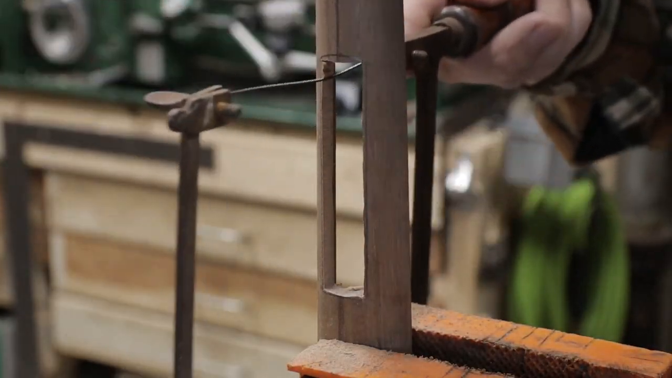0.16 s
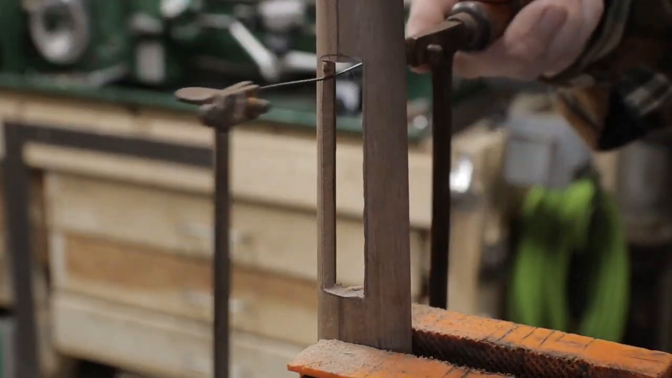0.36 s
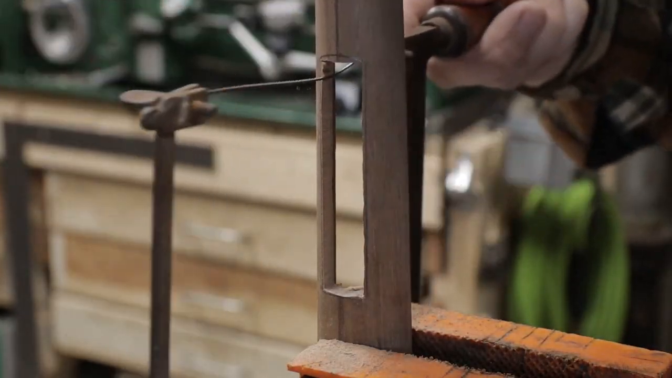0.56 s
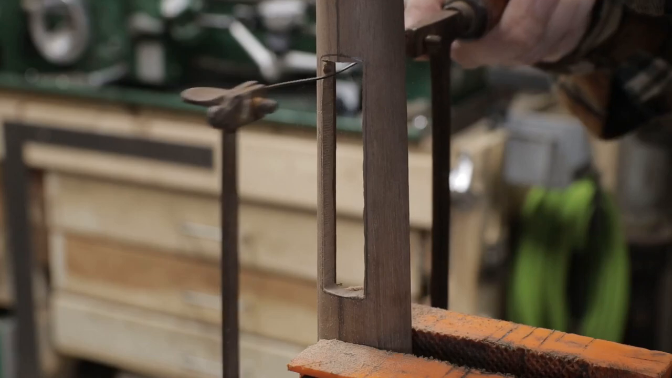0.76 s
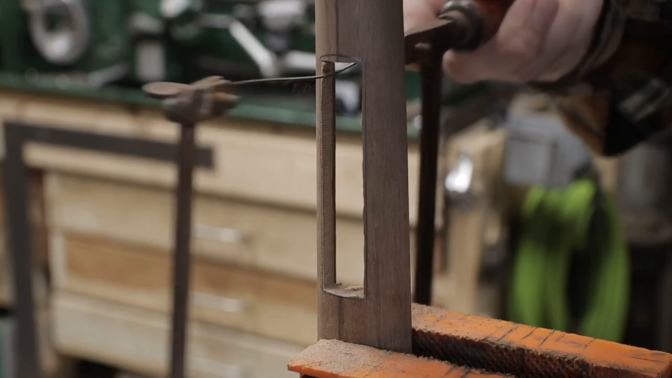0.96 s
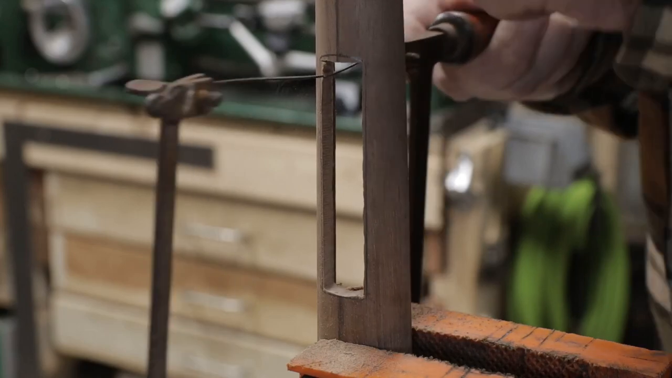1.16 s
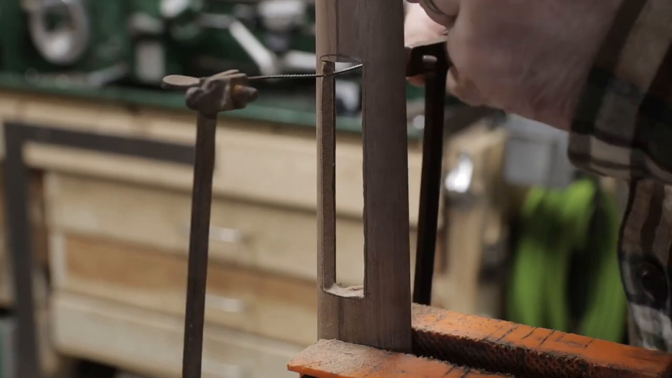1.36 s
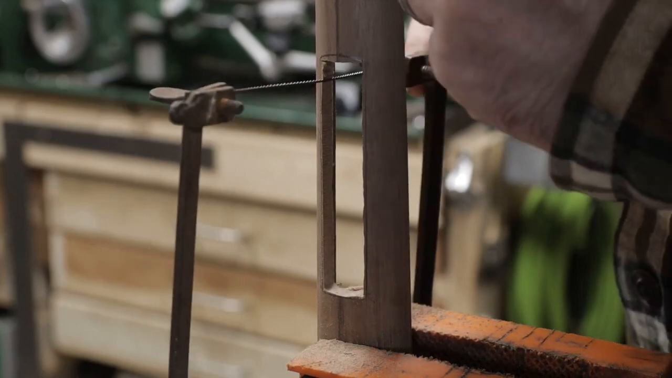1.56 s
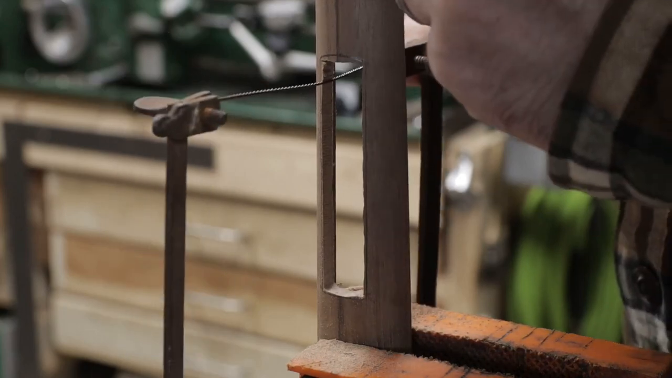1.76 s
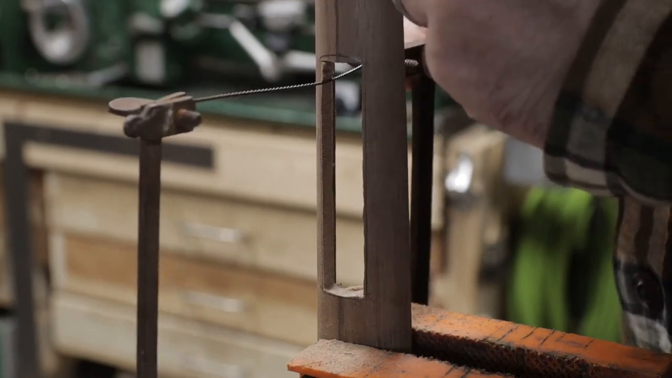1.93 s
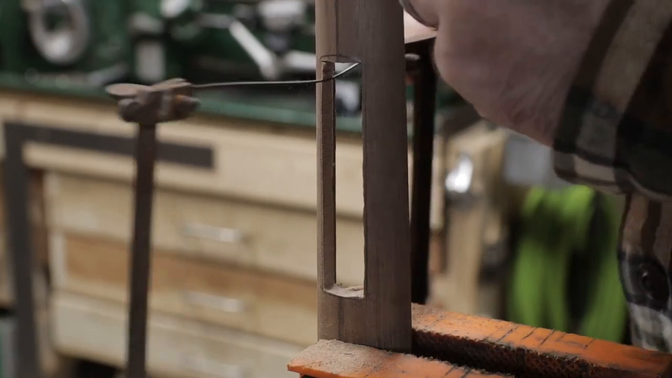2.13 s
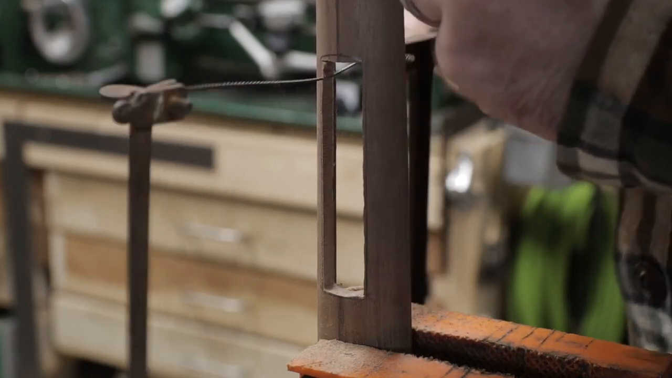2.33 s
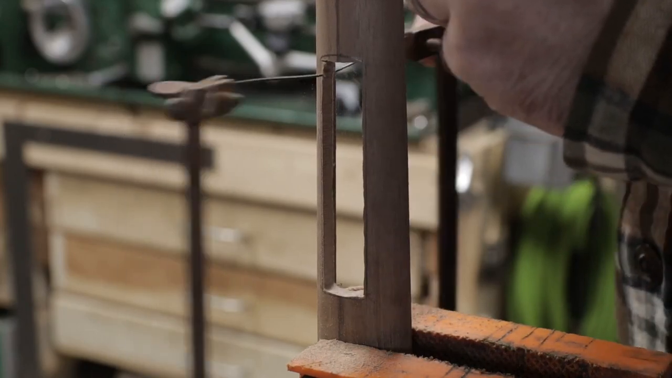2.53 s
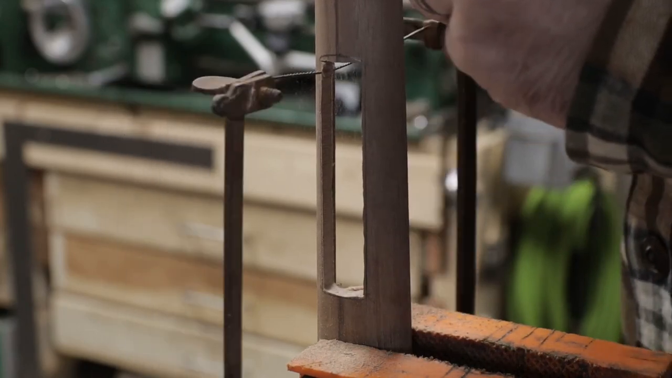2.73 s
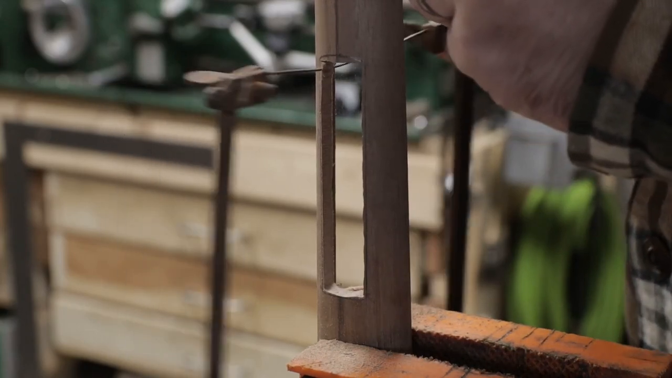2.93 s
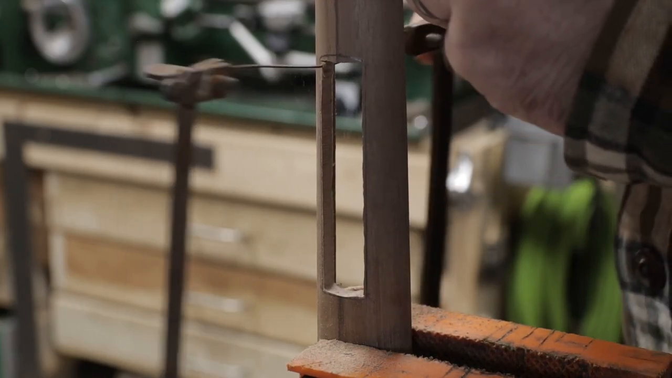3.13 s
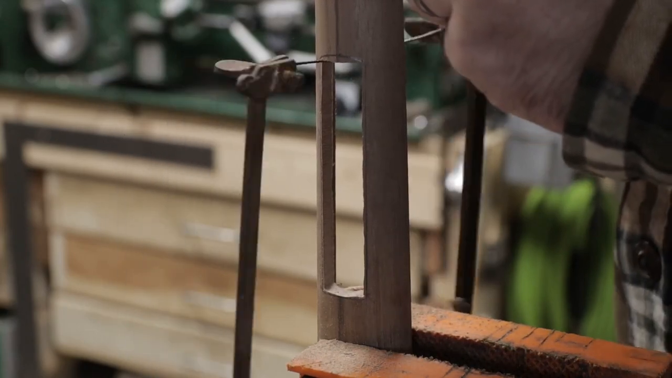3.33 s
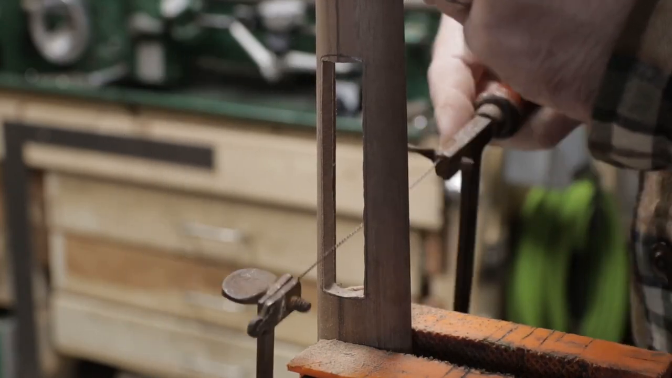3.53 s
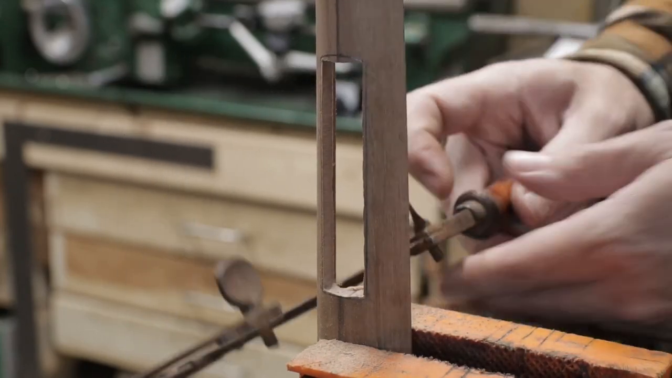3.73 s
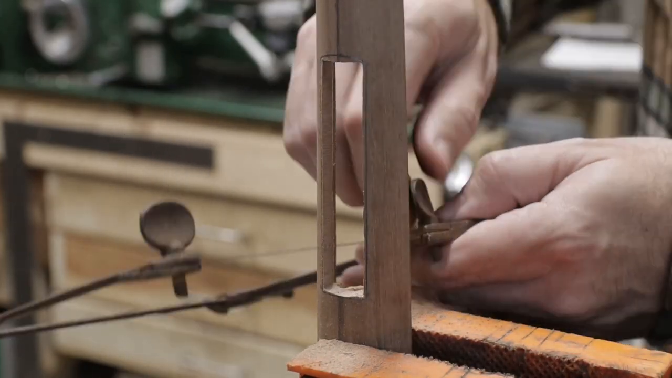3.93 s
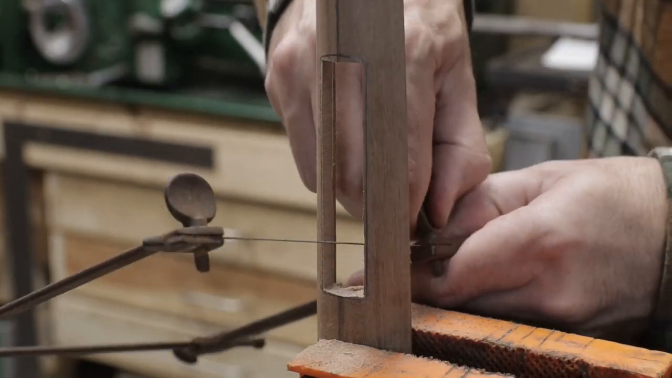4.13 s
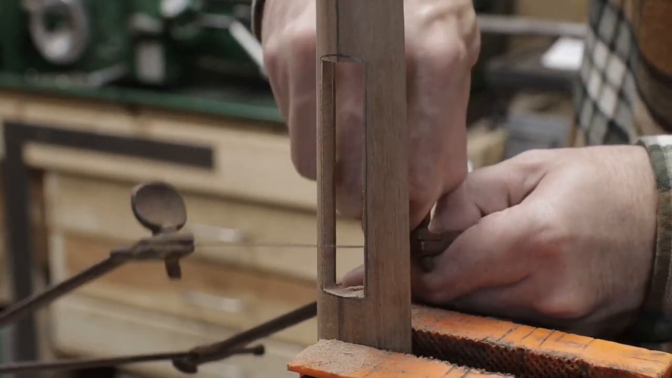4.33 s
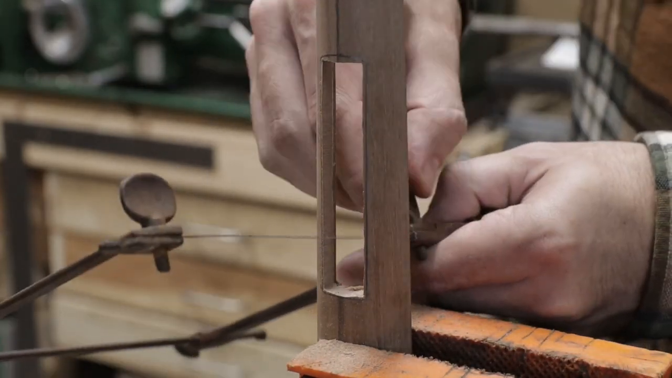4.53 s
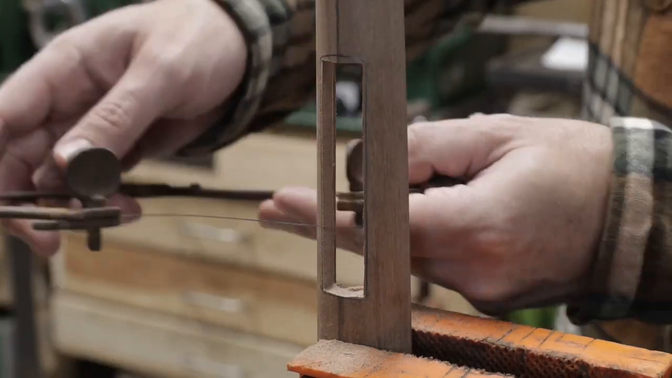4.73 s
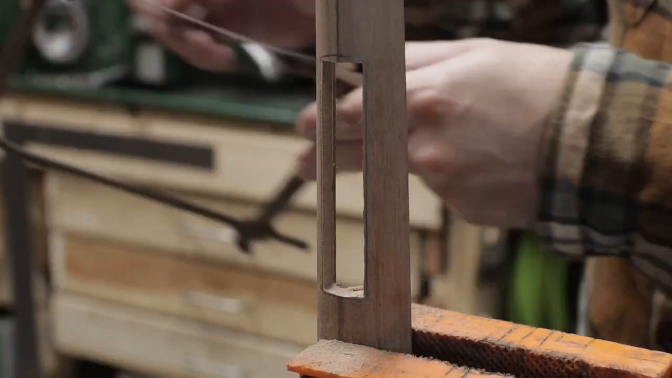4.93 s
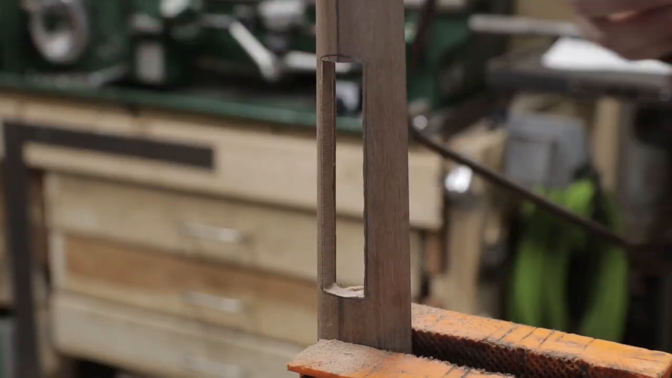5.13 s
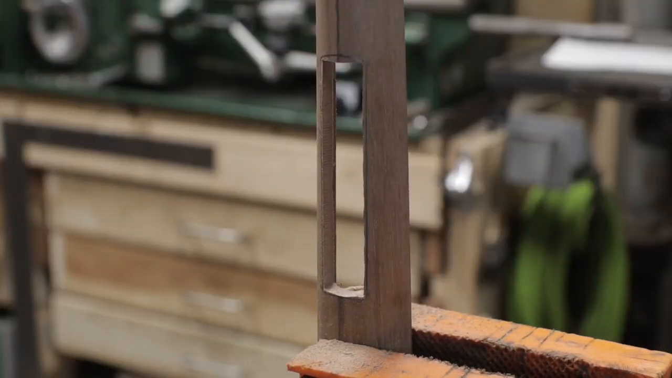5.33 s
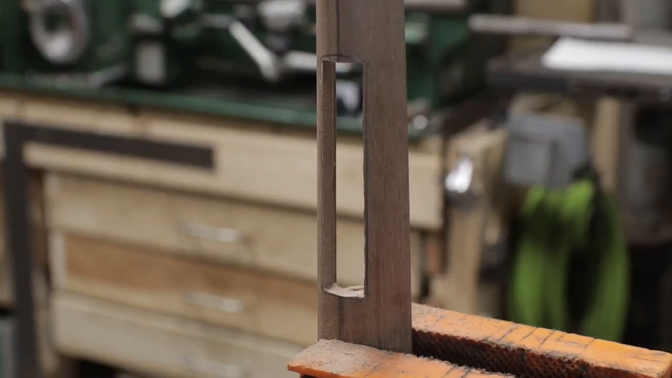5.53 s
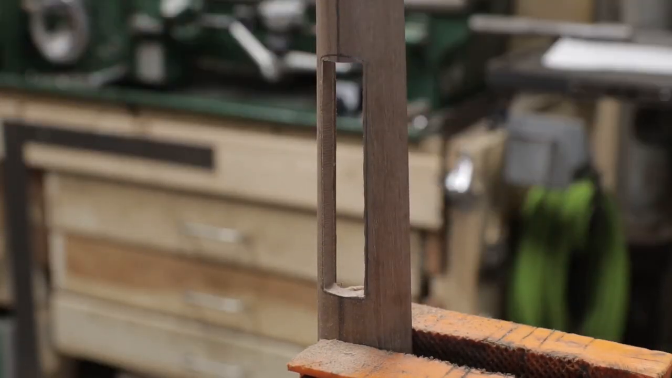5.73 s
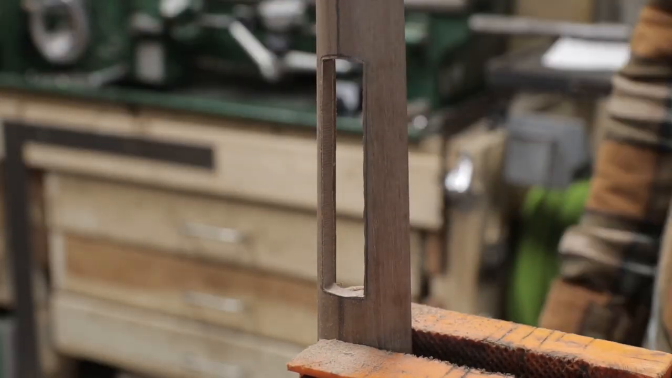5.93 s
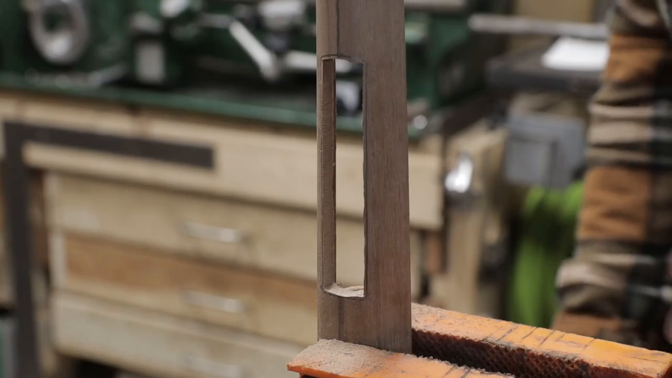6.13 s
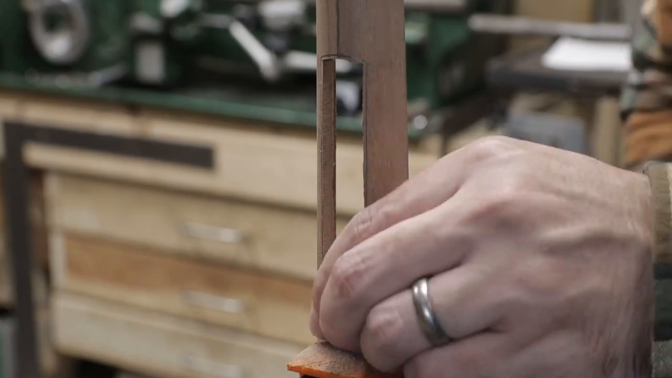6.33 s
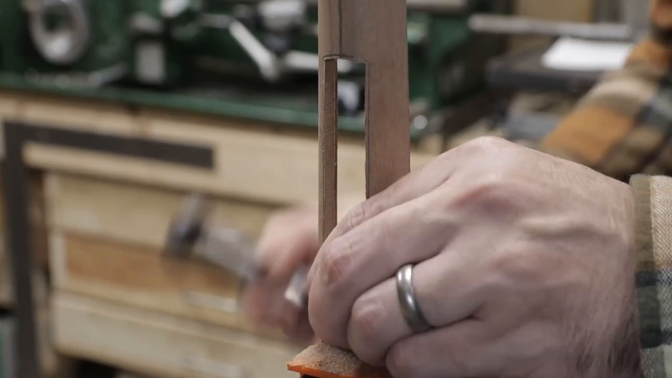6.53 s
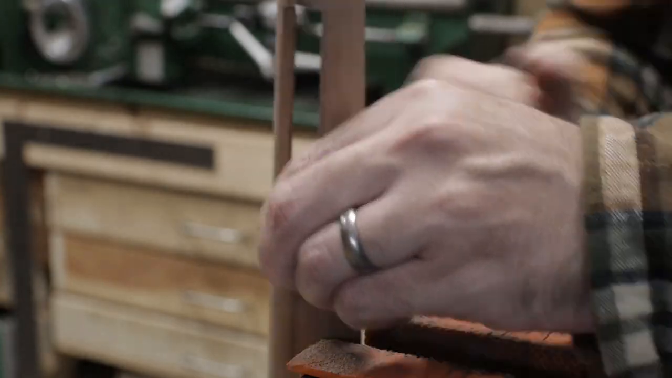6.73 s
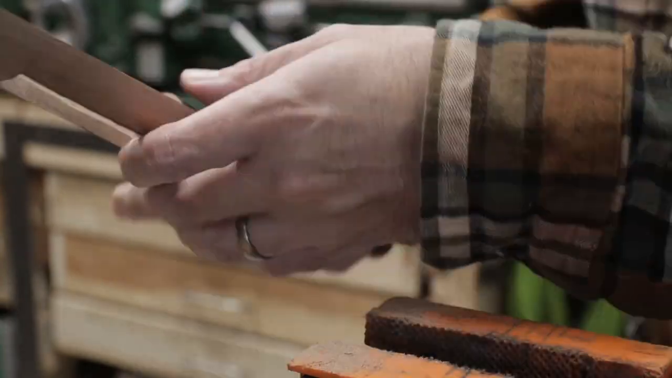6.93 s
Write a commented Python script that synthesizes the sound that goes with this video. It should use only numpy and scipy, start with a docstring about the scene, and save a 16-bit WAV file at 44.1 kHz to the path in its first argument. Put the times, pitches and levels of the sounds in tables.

```python
"""A small workshop, microphone close to the bench: a coping saw cuts a clamped wooden slat in two spells.
Each quick cut tears fibres (noisy grains), drives the resonances of the slat and shakes the bench;
each return rubs back more softly, and a few lone slides pass between.
Small metal clicks and finger brushes go with the unhooking of the blade, and two high pings ring off it.
Resonant knocks and scrapes take the slat out of its clamp; air, hum, hiss and a short room lie around."""
import sys
import numpy as np
from scipy import signal
from scipy.fft import rfft, irfft
from scipy.io import wavfile
from scipy.ndimage import uniform_filter1d

SR = 44100
rng = np.random.default_rng(int(sys.argv[2]) if len(sys.argv) > 2 else 0)


def inscribe(sig):
    """Save sig as 16-bit PCM at rate SR to the path in sys.argv[1].

    A 1-D sig is mono; a 2-D sig holds one channel per row.
    Samples are clipped to [-1, 1] before scaling.
    """
    pcm = np.round(np.clip(np.atleast_2d(sig).T, -1, 1) * 32767)
    wavfile.write(sys.argv[1], SR, pcm.astype(np.int16))


N = 312222  # length of the scene in samples
TAPS = 8192  # size of the filter spectra
HZ = np.fft.rfftfreq(TAPS, 1 / SR)
HIT_S = 0.012  # the level of a hit is its energy spread over this time


def amp(db):
    """Decibels to gain."""
    return 10 ** (np.asarray(db) / 20)


def unit(x):
    """Scales to rms 1."""
    return x / np.sqrt(np.mean(x ** 2) + 1e-20)


def read(points, hz):
    """Reads a table of values against frequency on a log-frequency axis."""
    f, value = np.transpose(points)
    return np.interp(np.log(hz + 1), np.log(f + 1), value)


def add(mix, s, sound):
    """Mixes a sound in at time s, cut off at the end of the mix."""
    part = mix[max(round(s * SR), 0):][:len(sound)]
    part += sound[:len(part)]


def band(lo_hz, hi_hz, order=4):
    """Gain of a band with smooth skirts."""
    low_skirt = 1 + (lo_hz / (HZ + 1)) ** (2 * order)
    high_skirt = 1 + (HZ / hi_hz) ** (2 * order)
    return 1 / np.sqrt(low_skirt * high_skirt)


def peaks(modes):
    """Gain of a set of resonances, their powers summed."""
    return np.sqrt(sum(amp(db) ** 2 / (1 + (2 * (HZ - hz) / width) ** 2) for hz, width, db in modes))


def spot(depth_db, width_hz):
    """Each point of contact favours some resonances and misses others: a random gain along frequency."""
    knots = np.arange(0, SR, max(width_hz, 50))
    favour = rng.standard_normal(SR // 40)[:len(knots)]
    return amp(depth_db * np.interp(HZ, knots, favour))


def causal(gain):
    """Minimum-phase impulse response with the shape of this gain: it rings only after the blow."""
    log_gain = np.log(np.maximum(gain / gain.max(), 1e-5))
    circle = np.concatenate([log_gain, log_gain[-2:0:-1]])
    response = np.fft.ifft(np.exp(np.conj(signal.hilbert(circle)))).real
    return response[:TAPS * 3 // 4]


def ring(drive, body, db, length):
    """Plays a drive through a body, with the energy of db held for length seconds."""
    y = signal.fftconvolve(drive, body)
    # a drive that happens to miss the resonances stays weaker
    usual = 0.85 * np.linalg.norm(drive) * np.linalg.norm(body)
    return amp(db) * np.sqrt(length * SR) * y / (max(np.linalg.norm(y), usual) + 1e-12)


def grains(n, per_s, spread_db):
    """Breaking fibres: random clicks, a few of them large, over a fine hiss."""
    size, luck, hiss = rng.standard_normal(n), rng.random(n), rng.standard_normal(n)
    big = amp(spread_db * np.minimum(rng.exponential(1, n), 3))
    breaks = np.sign(size) * big * (luck < per_s / SR)
    return unit(breaks) + 0.37 * hiss


# colour of the still air around the microphone: (f/Hz, relative density/dB)
AIR_COLOUR = [(15, -76.5), (25, -50.5), (195, -15), (229, -1.5), (263, -17), (293, -2), (384, -15.5),
              (463, -9), (531, -17.5), (695, -19), (1130, -21.5), (1440, -20), (2910, -26.5), (6050, -33),
              (16000, -43.5)]
AIR_DB = -70.5  # rms level of the air
# faint hum tones of a machine: (f/Hz, rms level/dB)
HUM_TONES = [(236.9, -76), (290.7, -78.5), (710.6, -83.5), (1412, -90)]
# narrow hiss in the room: centre, width of its resonance (narrower once squared), rms level
HISS_HZ, HISS_WIDTH_HZ, HISS_DB = 4580, 350, -88


def workshop():
    """The place at rest: noise shaped as still air, tones of wandering phase, and noise in a narrow band."""
    t = np.arange(N) / SR
    air_gain = amp(read(AIR_COLOUR, np.fft.rfftfreq(N, 1 / SR)))
    air = unit(irfft(rfft(rng.standard_normal(N)) * air_gain, N))
    hum = np.zeros(N)
    knots = np.linspace(0, t[-1], num=70)
    for hz, db in HUM_TONES:
        drift = np.cumsum(1.263 * rng.standard_normal(len(knots)))  # radians
        phase = 2 * np.pi * hz * t + np.interp(t, knots, drift)
        hum += amp(db) * np.sqrt(2) * np.sin(phase)
    narrow = causal(peaks([(HISS_HZ, HISS_WIDTH_HZ, 0)]) ** 2)
    hiss = unit(signal.fftconvolve(rng.standard_normal(N), narrow)[:N])
    return amp(AIR_DB) * air + hum + amp(HISS_DB) * hiss


# ring of the slat: (f/Hz, least width/Hz, relative level/dB)
SLAT_MODES = [(420, 23, -8), (511.6, 27, 7), (660, 48, -0.5), (845.5, 54, -1.5), (1028, 28, -15),
              (1191, 150, -3), (1244, 59, -2.5), (1404, 12, 2.5), (1730, 47, -4), (1770, 29, -15.5),
              (2035, 20, -9), (2300, 320, -3.5)]


def slat_gain(loss=0.035):
    """Wood is lossy: no mode is narrower than a set share of its pitch."""
    return peaks([(hz, max(width, loss * hz), db) for hz, width, db in SLAT_MODES])


# ring of the steel blade and frame: (f/Hz, width/Hz, relative level/dB)
STEEL_MODES = [(2370, 220, -12), (2830, 120, -5), (3100, 250, -11), (3643, 190, -13), (4440, 340, -11),
               (5086, 360, -5), (5460, 280, -10.5), (5800, 300, -14.5), (7760, 98, -17), (7540, 92, 1),
               (7916, 128, 5.5), (8300, 60, -4), (8930, 90, 0), (8330, 190, 1), (8720, 36, 3.5),
               (9000, 41, 0.5), (9660, 150, 0), (10150, 140, -7.5), (10900, 810, -18.5),
               (12160, 260, -10.5), (14500, 590, -6), (14350, 450, -3.5), (14000, 180, -6.5),
               (14960, 500, -18)]
# tearing fibres, heard directly: (f/Hz, relative level/dB)
FIBRE_COLOUR = [(100, -61), (900, -22), (1800, -6.5), (3000, -14), (7000, -12.5), (11000, -24.5),
                (16000, -15)]
# low sway of slat, clamp and bench: (f/Hz, width/Hz, relative level/dB)
BENCH_MODES = [(193, 15, -3.5), (215.5, 15, 4.5), (233, 24, -14), (275.8, 18, 2.5), (309.7, 21, -1),
               (333.8, 14, -3.5), (429, 46, -10.5), (485, 20, -12)]


def bodies():
    """What the saw excites: gains of steel with fibres and of the slat, and the bench's impulse response."""
    steel = np.hypot(peaks(STEEL_MODES) * band(1900, 17000, order=3), amp(read(FIBRE_COLOUR, HZ)))
    slat = slat_gain() * band(400, 2400, order=4)
    rumble = amp(-14) * band(20, 200, order=2)
    bench = peaks(BENCH_MODES) * (band(208.6, 520, order=7) + rumble)
    return steel, slat, causal(bench)


def stroke(length, force, teeth_hz, jitter):
    """Force curve and tooth impacts of one stroke; the blade speeds up and slows down."""
    u = np.linspace(0, 1, max(int(length * SR), 200))
    press = amp(np.interp(u, *np.transpose(force)))
    speed = (0.1 + 0.9 * np.sin(np.pi * u)) ** 0.45
    wobble = unit(uniform_filter1d(rng.standard_normal(len(u)), size=40))
    turns = np.cumsum(teeth_hz * speed * (1 + jitter * wobble)) / SR + rng.random()
    # each tooth hits sharply and fades before the next
    return press, unit(np.exp(-(turns % 1) / 0.34))


# force along a sliding stroke: (share of the stroke, relative level/dB)
SLIDING_FORCE = [(0, -11), (.2, -4), (0.401, 2), (.58, 2.5), (0.748, -1), (.9, -12.5), (1, -25)]


def slide(length, rasp_db, shake_db, steel, slat, bench):
    """The blade rubs through the kerf without biting: dense grains ring steel and slat, the bench sways."""
    press, teeth = stroke(length, SLIDING_FORCE, teeth_hz=1430, jitter=0.2)
    n = len(press)
    rubbing = press * grains(n, per_s=12000, spread_db=4.5) * (1.2 + 0.22 * teeth)
    rasp = ring(rubbing, causal(steel * spot(depth_db=2.0, width_hz=260)), rasp_db, length)
    wood = ring(rubbing, causal(slat * spot(depth_db=6.5, width_hz=112)), rasp_db - 16.5, length)
    sway = np.linspace(1, 0.4, n) * np.hanning(n) ** 0.29
    shake = ring(sway * rng.standard_normal(n), bench, shake_db, length)
    return rasp + wood + shake


# force along a cutting stroke: (share of the stroke, relative level/dB)
CUTTING_FORCE = [(0, -12), (0.041, -4), (.14, -3), (0.221, 0.5), (.48, -1.5), (.72, -6), (.88, -11),
                 (0.999, -29.5)]
TEETH_PER_CUT = 41  # at top blade speed; a fixed count, so short cuts sound higher


def cut(length, rasp_db, bite_db, shake_db, steel, slat, bench):
    """Every tooth tears a burst of fibres, rings the blade and kicks the wood."""
    teeth_hz = TEETH_PER_CUT / length
    press, teeth = stroke(length, CUTTING_FORCE, teeth_hz, jitter=0.15)
    n = len(press)
    tearing = grains(n, per_s=6000, spread_db=1.5) * (0.75 + 0.55 * teeth)
    blade = causal(steel * spot(depth_db=2.34, width_hz=260))
    rasp = ring(press * tearing, blade, rasp_db, length)
    # the wood answers most near the rate at which the teeth strike it
    answer = 1 + peaks([(teeth_hz, 300, -4)])
    wood = causal(slat * spot(depth_db=3.5, width_hz=109.9) * answer)
    kicks = press * (teeth - teeth.mean() + rng.standard_normal(n))
    bite = ring(kicks, wood, bite_db, length)
    # the heavy bench takes a moment to start moving
    sway = press ** 0.71 * (1 - np.exp(-np.arange(n) / SR / 0.00067))
    shake = ring(sway * rng.standard_normal(n), bench, shake_db, length)
    return rasp + bite + shake


# lone, slow slides of the blade in the kerf: (t/s, length/s, rasp level/dB, shake level/dB)
LONE_SLIDES = [(0.0, 0.054, -64.5, -58.5), (1.218, 0.11, -59.5, -72), (1.344, 0.091, -44.5, -50),
               (1.851, 0.051, -65, -71), (1.982, 0.059, -64.5, -67), (3.475, 0.061, -63.5, -69)]
# strokes, each a cut and its return: (t/s, bite level of the teeth/dB, shake level of the slat/dB)
SAW_STROKES = [(0.056, -57, -50.5), (0.146, -59.5, -46.5), (0.2385, -49.5, -60), (0.318, -44, -43.5),
               (0.3972, -49, -42), (0.4786, -48, -43.5), (0.5576, -47.5, -51), (0.637, -44, -42.5),
               (0.7158, -49, -51.5), (0.7994, -47.5, -36), (0.8751, -40, -47.5), (0.9585, -44, -41),
               (1.044, -48, -49), (1.1332, -52, -48), (2.033, -42, -37), (2.1235, -42.5, -43),
               (2.21, -42.5, -39), (2.2953, -40, -43), (2.386, -41.5, -41.5), (2.4758, -41.5, -41),
               (2.5692, -45, -43), (2.6591, -41.5, -44), (2.7471, -42.5, -41.5), (2.8392, -45, -47.5),
               (2.93, -42.5, -42.5), (3.0265, -42, -44), (3.116, -47, -41.5), (3.215, -50, -50),
               (3.336, -44, -39.5)]
# the arm warms to its work in each spell: (t/s, rasp level/dB)
ARM_EFFORT = [(0.056, -53.5), (0.32, -40.5), (0.66, -38), (0.96, -37), (1.13, -40.7), (2.03, -40.5),
              (2.21, -36.5), (2.39, -35), (3.03, -35), (3.34, -38.5)]
LONGEST_CYCLE_S, LONGEST_CUT_S = 0.11, 0.049  # a cycle lasts until the next stroke, at most this long
RETURN_S, TURN_S, REST_S = 0.039, 0.004, 0.004  # the quickest return, and the stops before and after it
# the return follows the effort, but only so far; its shake is set against that of the cut
RETURN_DB, RETURN_LIMIT_DB, RETURN_SHAKE_DB = -1, -39, -16


def saw(*parts):
    """Cut, turn, return, rest: the cut fills what the quickest return leaves, up to its longest."""
    out = np.zeros(N)
    for s, *row in LONE_SLIDES:
        add(out, s, slide(*row, *parts))
    starts = [row[0] for row in SAW_STROKES]
    cycles = np.minimum(np.diff(starts, append=np.inf), LONGEST_CYCLE_S)
    for (s, bite_db, shake_db), cycle in zip(SAW_STROKES, cycles):
        moving = cycle - TURN_S - REST_S
        length = np.clip(moving - RETURN_S, 0.01, LONGEST_CUT_S)
        back = moving - length
        effort_db = np.interp(s, *np.transpose(ARM_EFFORT))
        add(out, s, cut(length, effort_db, bite_db, shake_db, *parts))
        # a slower return is softer
        rub = RETURN_S / back / np.hypot(amp(-effort_db - RETURN_DB), amp(-RETURN_LIMIT_DB))
        sliding = slide(back, 20 * np.log10(rub), shake_db + RETURN_SHAKE_DB, *parts)
        add(out, s + length + TURN_S, sliding)
    return out


def blow(length, tick, rise_s=0.00003):
    """A first contact, a chatter that falls 60 dB in length seconds, and a fainter scuff three times as long."""
    t = np.arange(SR // 8) / SR
    chatter = rng.standard_normal(len(t)) * (1 - np.exp(-t / rise_s))
    fall_db = -60 * t / max(length, 0.002)
    return chatter * (amp(fall_db) + 0.13 * amp(fall_db / 3) + tick * np.exp(-t / 0.0004))


# clicks of the blade and its clamps: (t/s, level/dB, brightness/dB per octave, length/s)
METAL_CLICKS = [(0.806, -40, 3, 0.02), (1.468, -47, -0.5, 0.038), (1.4786, -46.5, -3, 0.049),
                (1.542, -44.5, -3, .04), (1.552, -51.5, -4.5, 0.051), (1.573, -50, -3, 0.022),
                (1.686, -58.5, 0, 0.048), (3.3372, -31.5, -7, 0.046), (3.714, -49, -7.5, 0.066),
                (3.9489, -62, 10, 0.04), (4.054, -60.5, -4.5, .06), (4.2343, -52.5, 7, 0.03),
                (4.759, -50.5, 13, 0.055), (4.858, -54.5, 16, .035), (5.041, -56, 1, 0.046)]
# ring of blade clamps and thumbscrews: (f/Hz, width/Hz, relative level/dB)
CLAMP_MODES = [(1630, 510, -4.5), (2546, 200, -8.5), (3987, 170, 2.5), (5450, 470, -1.5), (6700, 340, -3.5),
               (7670, 240, 5.5), (8680, 410, 3.5), (10300, 300, 2.5), (10700, 820, -1), (11890, 300, -10),
               (13400, 220, -1.5), (15180, 490, 9)]
# the slack blade springs free and sings: (t/s, f/Hz, starting level/dB, t60/s)
BLADE_PINGS = [(4.979, 13800, -46.5, .13), (4.98, 11100, -55, 0.066)]
CLICK_PIVOT_HZ = 8000  # brightness tilts the ring about this pitch


def clicks(scuff_db=-22):
    """Small steel parts scuff together and seat, each with its own brightness; sines sing off the blade."""
    out = np.zeros(N)
    lead = SR // 80  # samples of scuff before the contact
    for s, db, tilt_db, length in METAL_CLICKS:
        tilt = amp(tilt_db * np.log2((HZ + 1) / CLICK_PIVOT_HZ))
        colour = tilt * band(2300, 15000, order=4)
        steel = causal((peaks(CLAMP_MODES) + 0.06) * colour * spot(depth_db=5.0, width_hz=510))
        scuff = np.linspace(0, 1, lead) * rng.standard_normal(lead)
        add(out, s - lead / SR, ring(scuff, steel, db + scuff_db, HIT_S))
        add(out, s, ring(blow(length, tick=0.8), steel, db, HIT_S))
    t = np.arange(SR // 4) / SR
    for s, hz, db, t60 in BLADE_PINGS:
        fade = amp(db - 60 * t / t60) * (1 - np.exp(-t / 0.00075))
        add(out, s, fade * np.sin(2 * np.pi * hz * t))
    return out


def fingers(level_db=-77, count=24):
    """Soft brushes of fingers on the frame while the blade is taken out: short swells of bright noise."""
    out = np.zeros(N)
    start, end = 3.5, 5.6  # s
    for when, size, span in rng.random((count, 3)):
        length = 0.0068 + 0.071 * span  # s
        n = int(length * SR)
        brush = np.hanning(n) * rng.standard_normal(n)
        colour = causal(band(2000, 13000, order=2) * spot(depth_db=8, width_hz=567))
        add(out, start + when * (end - start), ring(brush, colour, level_db + 6 * (size - 0.5), length))
    return out


# knocks on the wood: (t/s, ring level/dB, thud level/dB, hardness of the contact/dB, centre of ring f/Hz)
WOOD_KNOCKS = [(4.36, -49.5, -51.5, -19.5, 1820), (5.139, -59, -54.5, -10.5, 1260),
               (5.46, -91, -56, 9, 1200), (5.776, -79, -59.5, -18, 1200), (6.5239, -42.5, -44, -9.5, 1140),
               (6.565, -35, -33, -31, 930), (6.602, -43, -50, -10.5, 1070), (6.634, -53.5, -55, -3, 1200),
               (6.664, -34, -35, -6.5, 880), (6.723, -43.5, -44, -19, 1500),
               (6.7313, -41.5, -37.5, 1, 1130), (6.764, -42.5, -37.5, -12.5, 880),
               (6.825, -50.5, -41, -4.5, 1250), (6.925, -71, -53, -2.5, 1200),
               (7.037, -52, -54, -7.5, 1280)]
# 60 dB decay of the wood and of the bench; the wood yields briefly as it is struck
KNOCK_S, THUD_S, KNOCK_RISE_S = 0.04, 0.071, 0.0014
CRACK_DB, SNAP_DB, SNAP_GROWTH = 3.5, 0.5, 1.74  # against the ring; the snap grows faster with hardness


def knocks(bench):
    """Wood strikes wood: the ring of the slat, a bench thud, and a crack and snap that grow with hardness."""
    out = np.zeros(N)
    for s, ring_db, thud_db, hard_db, centre_hz in WOOD_KNOCKS:
        colour = spot(depth_db=2.0, width_hz=390)
        reach = band(0.5 * centre_hz, 1.96 * centre_hz, order=4) * band(20, 2260, order=6)
        wood = causal(slat_gain() ** 0.39 * reach * colour)
        crack = causal(band(3220, 4400, order=7) * colour)
        snap = causal(band(5500, 13300, order=6) * colour / (1 + HZ / 9000))
        hit = blow(KNOCK_S, tick=0.1, rise_s=KNOCK_RISE_S)
        add(out, s, ring(hit, wood, ring_db, HIT_S))
        add(out, s, ring(hit, crack, ring_db + CRACK_DB + hard_db, HIT_S))
        add(out, s, ring(hit, snap, ring_db + SNAP_DB + SNAP_GROWTH * hard_db, HIT_S))
        add(out, s, ring(blow(THUD_S, tick=0.1), bench, thud_db, HIT_S))
    return out


# the slat dragging out of the clamp and through the hands:
# (t/s, length/s, rub level/dB, shudder level/dB, hiss level/dB)
SLAT_SCRAPES = [(6.437, 0.18, -70, -61.5, -80), (6.59, 0.096, -55, -46.5, -75),
                (6.746, 0.066, -55, -44, -86), (6.994, 0.08, -54.5, -63.5, -81.5),
                (7.052, 0.036, -66, -53.5, -53.5)]
SCRAPE_ATTACK_S, SCRAPE_RELEASE_S = 0.0053, 0.027


def drag(bench):
    """Random small slips drive slat, bench and a hiss; each scrape grips quickly, holds and lets go."""
    out = np.zeros(N)
    for s, length, *levels in SLAT_SCRAPES:
        t = np.arange(int(length * SR)) / SR
        grip = np.minimum(t / SCRAPE_ATTACK_S, 1) * np.minimum((length - t) / SCRAPE_RELEASE_S, 1)
        slips = grip * grains(len(t), per_s=1500, spread_db=6.5)
        rub = slat_gain() ** 0.52 * band(930, 4600, order=5) * spot(depth_db=3.5, width_hz=140)
        hiss = band(4850, 18000, order=2) * spot(depth_db=5.0, width_hz=670)
        for body, db in zip((causal(rub), bench, causal(hiss)), levels):
            add(out, s, ring(slips, body, db, length))
    return out


# how fast the small room dies away: (f/Hz, t60/s)
ROOM_DECAY = [(150, 0.12), (500, 0.11), (2000, 0.17), (8000, 0.034), (16000, 0.084)]


def room(x, wet_db):
    """Dense reflections from bench and walls, each band dying at its own speed."""
    taps = rng.standard_normal(SR // 2) * (rng.random(SR // 2) < 3000 / SR)
    taps[:int(0.004 * SR)] = 0  # nothing returns to the microphone at once
    hz, t, z = signal.stft(taps, SR, nperseg=256)
    decay = amp(-60 * t / read(ROOM_DECAY, hz)[:, None])
    tail = signal.istft(z * decay, SR)[1]
    return x + amp(wet_db) * signal.fftconvolve(x, tail / np.linalg.norm(tail))[:N]


# side level against mid, by frequency: (f/Hz, level/dB)
SIDE_LEVEL = [(200, -46), (2800, -44), (5000, -21), (16000, -19)]


def scene():
    """All sources sit in the middle; a faint side signal, mainly treble, comes from a phase-scattering filter."""
    steel, slat, bench = bodies()
    sawing = saw(steel, slat, bench)
    handling = clicks() + fingers() + knocks(bench) + drag(bench)
    mid = room(sawing, wet_db=-12) + room(handling, wet_db=-15.5) + workshop()
    scatter = np.angle(rfft(rng.standard_normal(300), TAPS))
    side_filter = irfft(np.exp(1j * scatter) * amp(read(SIDE_LEVEL, HZ)))
    side = signal.fftconvolve(mid, np.roll(side_filter, TAPS // 2))[TAPS // 2:][:N]
    return np.array([mid + side, mid - side])


EDGE_HZ = 15900


def record(dry):
    """The recorder's band limit: a steep low-pass."""
    lowpass = signal.firwin(401, EDGE_HZ, window=("kaiser", 8), fs=SR)
    return signal.oaconvolve(dry, lowpass[None], "same")


dry = scene()
out = record(dry)
inscribe(out)
```